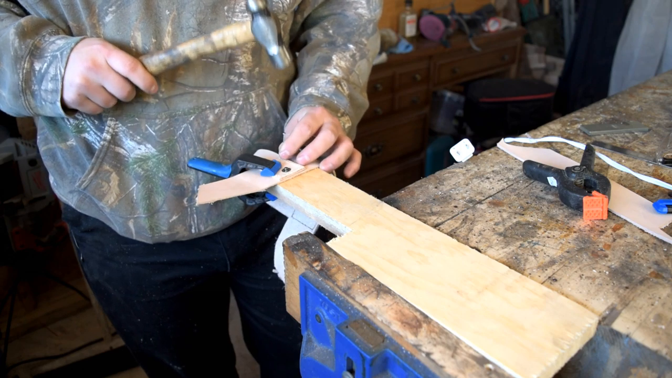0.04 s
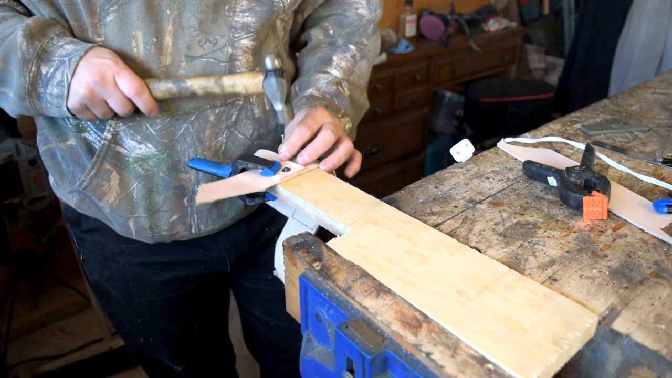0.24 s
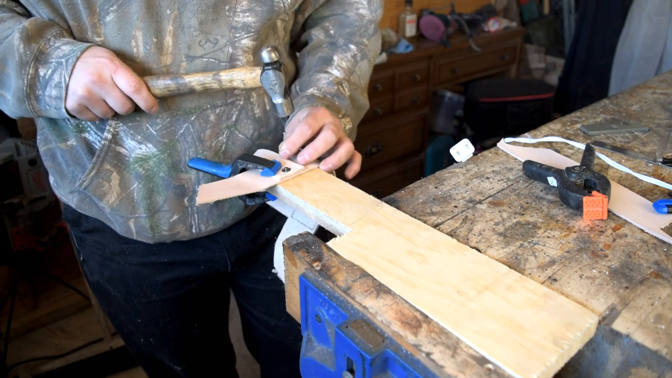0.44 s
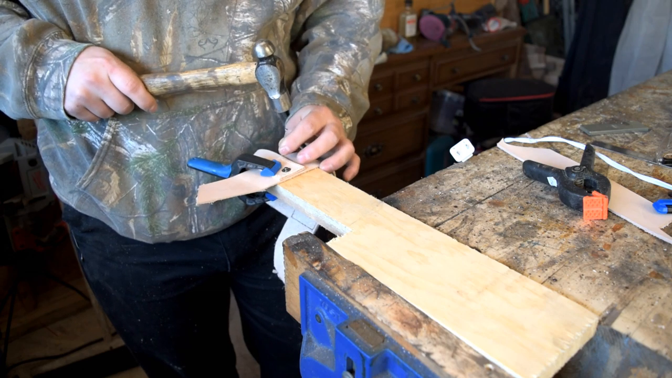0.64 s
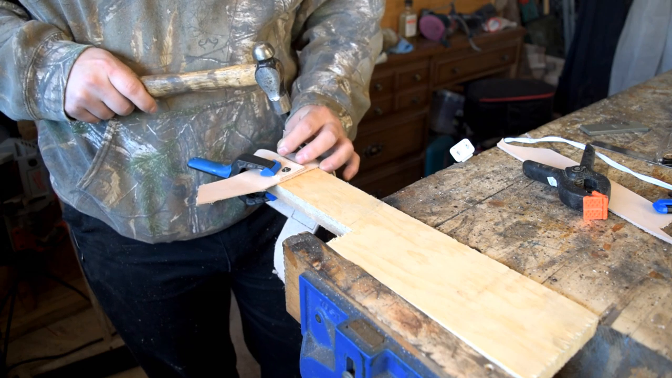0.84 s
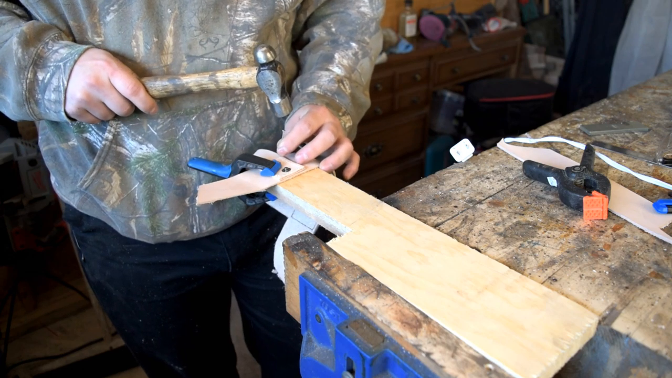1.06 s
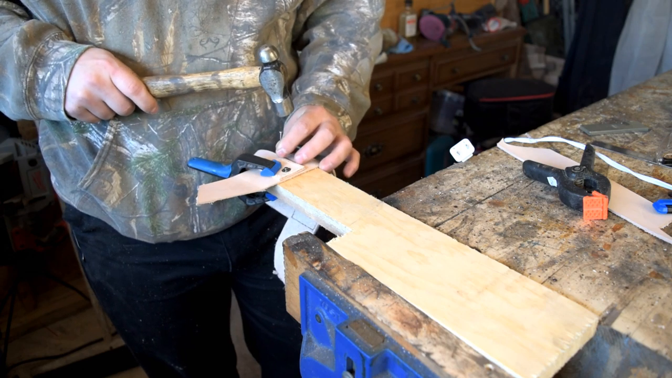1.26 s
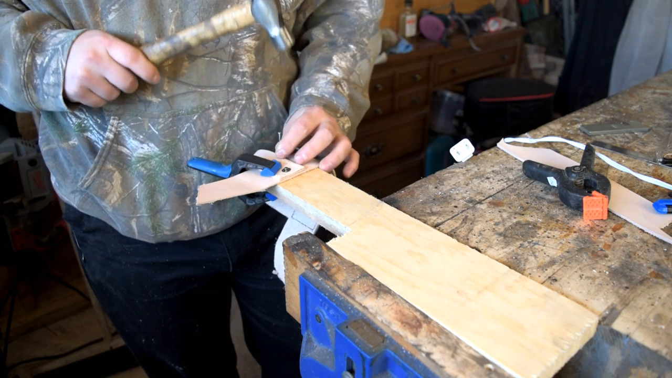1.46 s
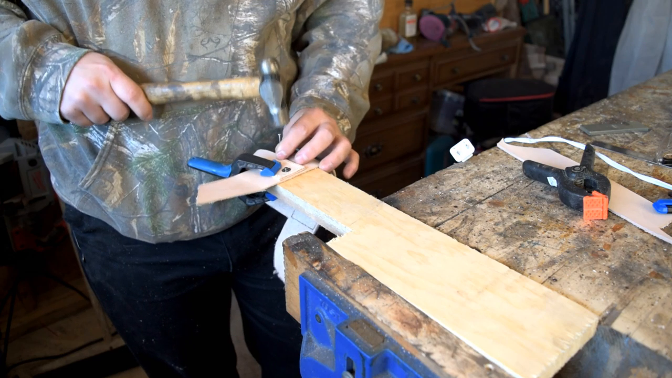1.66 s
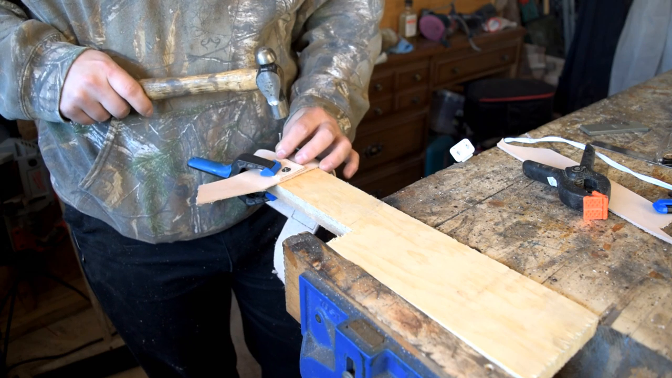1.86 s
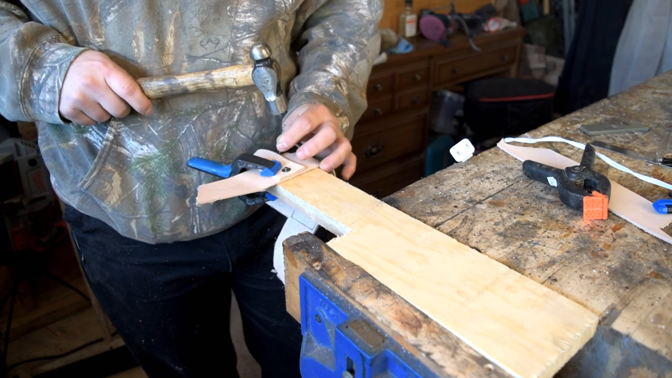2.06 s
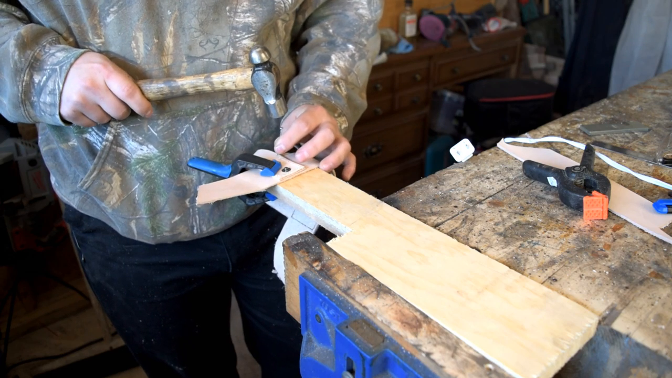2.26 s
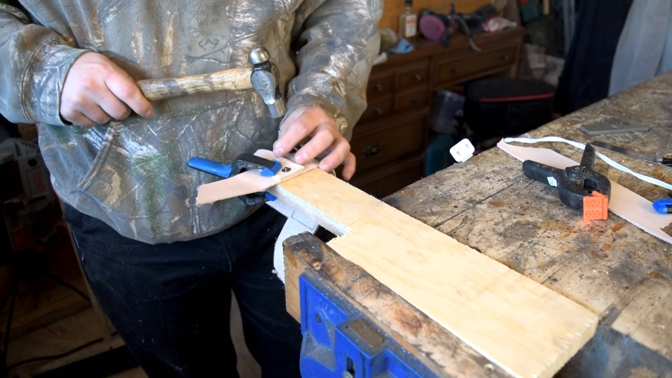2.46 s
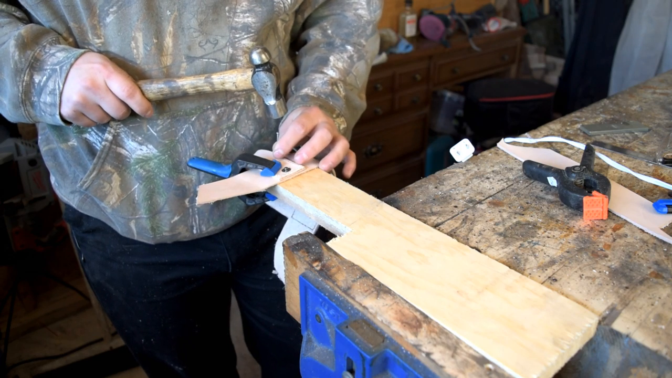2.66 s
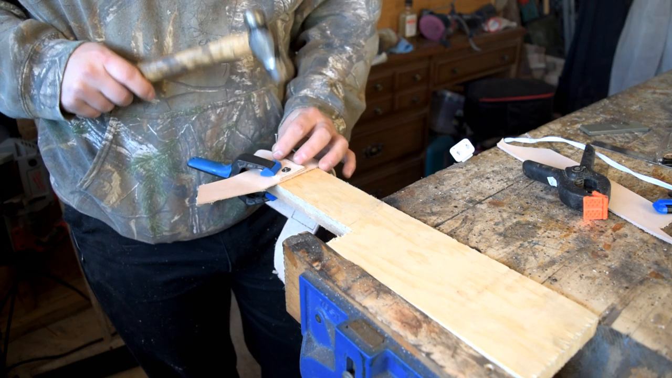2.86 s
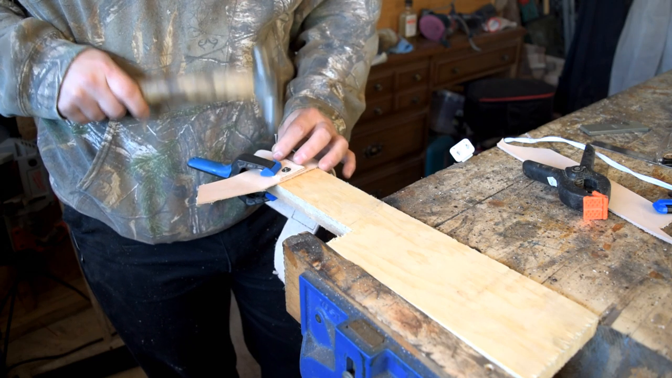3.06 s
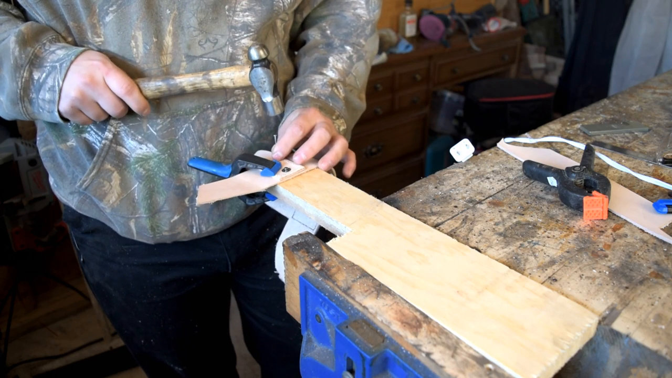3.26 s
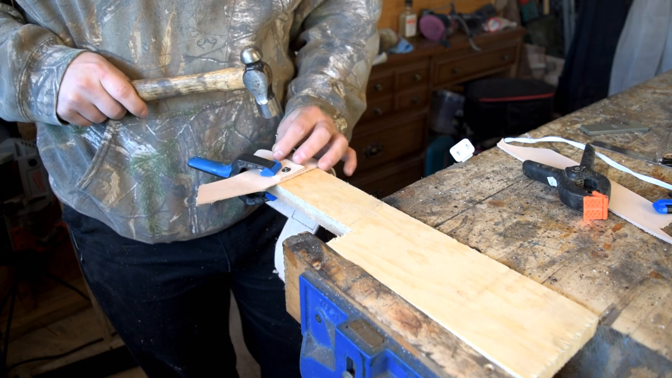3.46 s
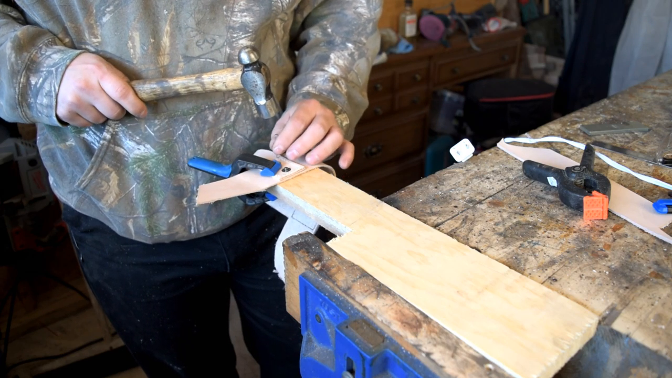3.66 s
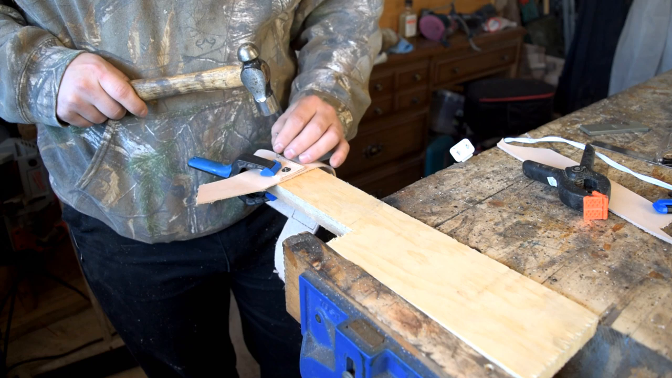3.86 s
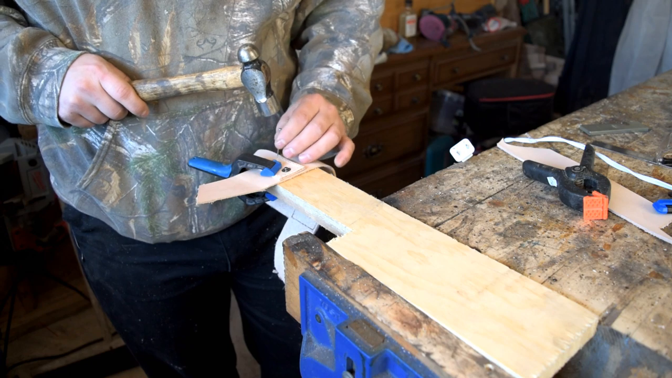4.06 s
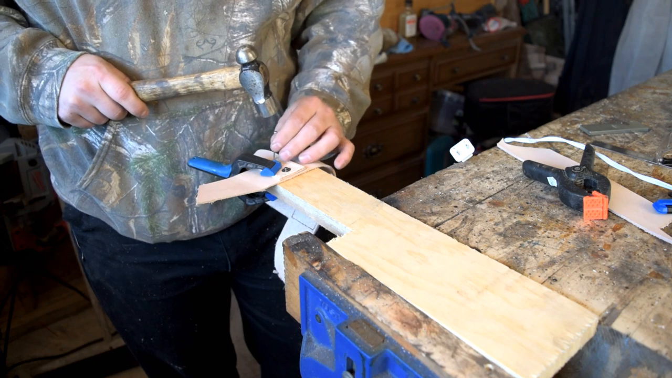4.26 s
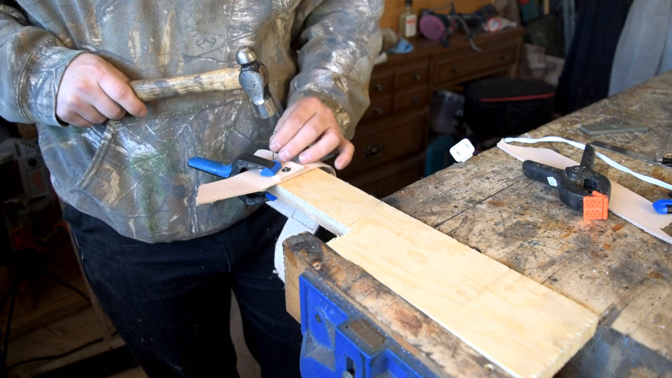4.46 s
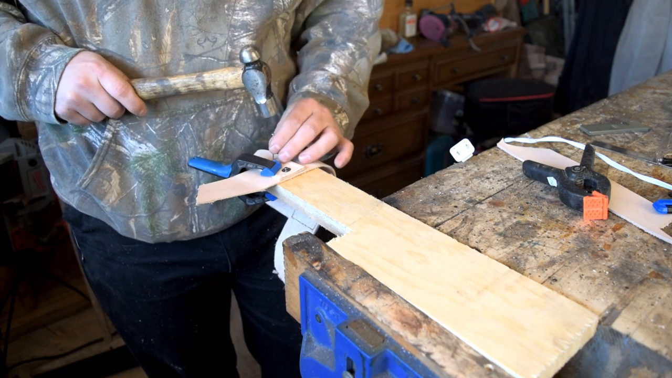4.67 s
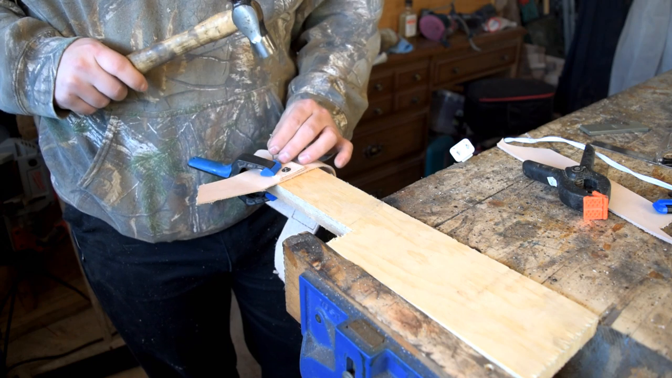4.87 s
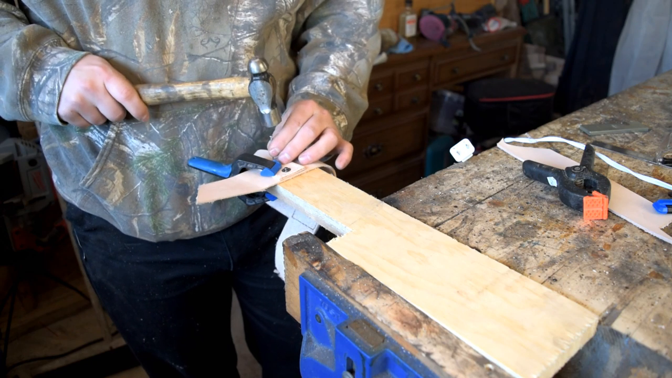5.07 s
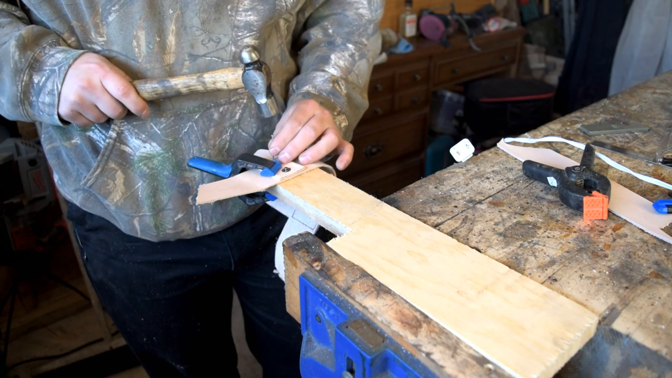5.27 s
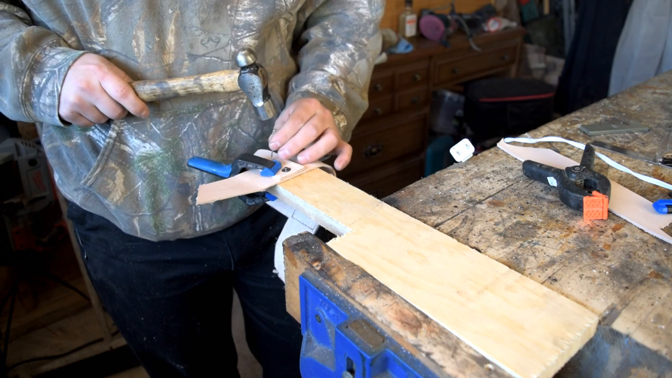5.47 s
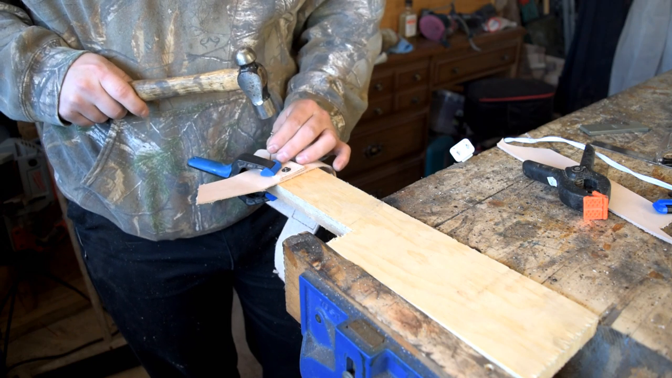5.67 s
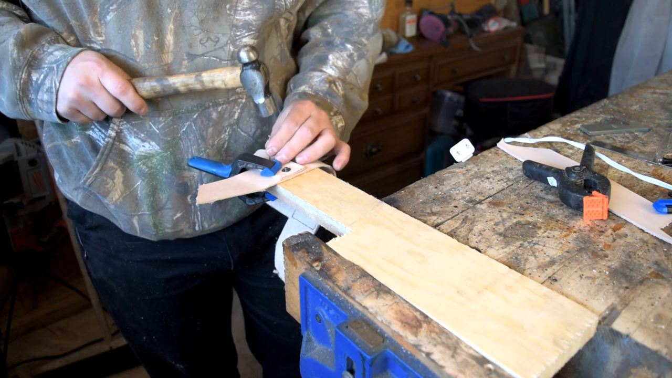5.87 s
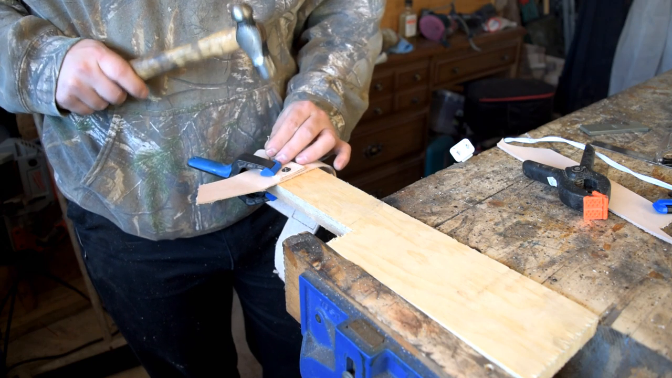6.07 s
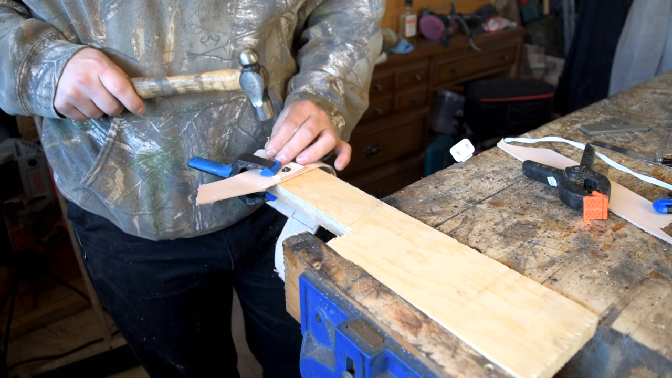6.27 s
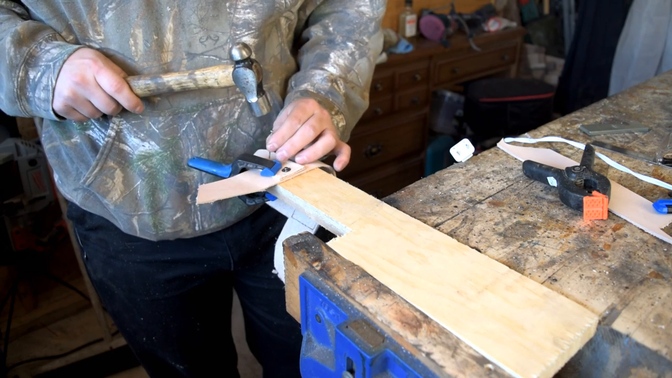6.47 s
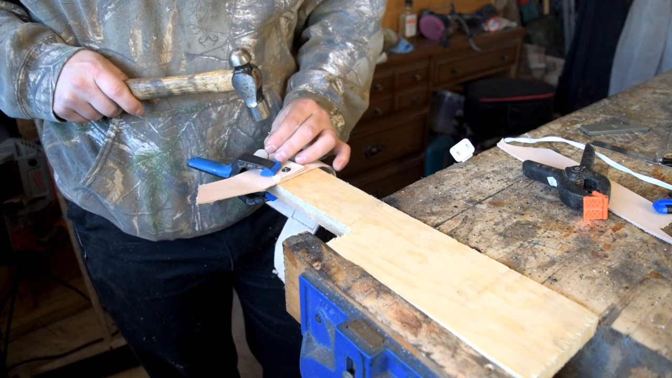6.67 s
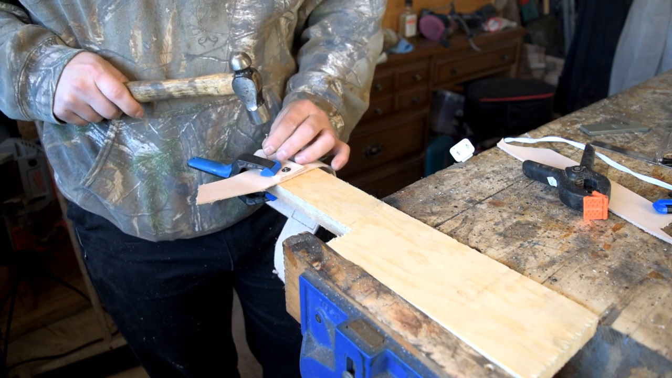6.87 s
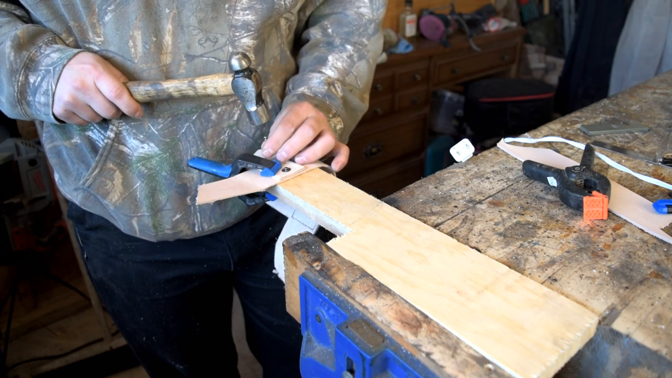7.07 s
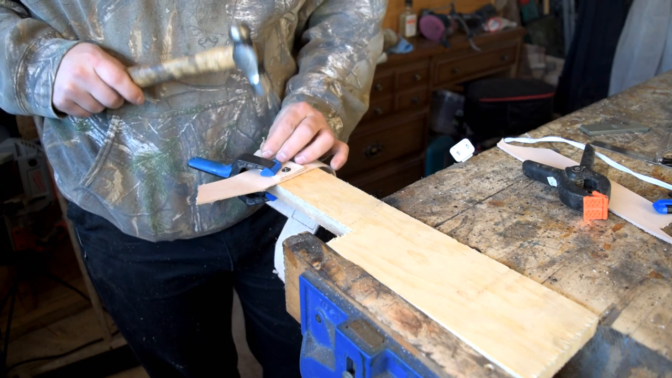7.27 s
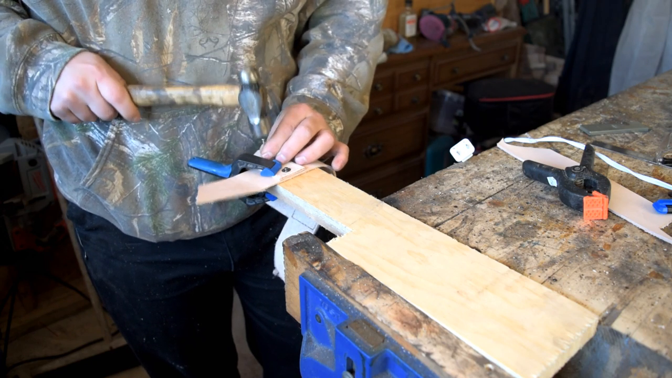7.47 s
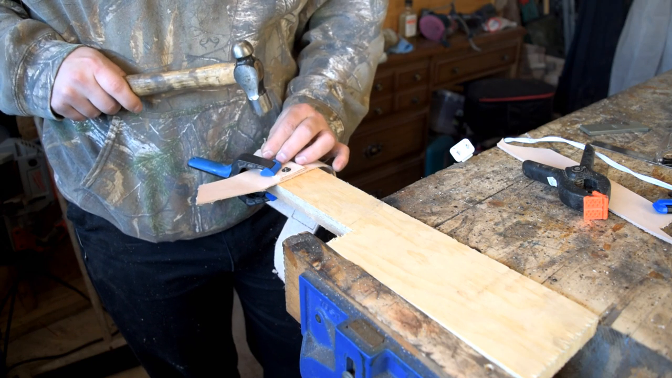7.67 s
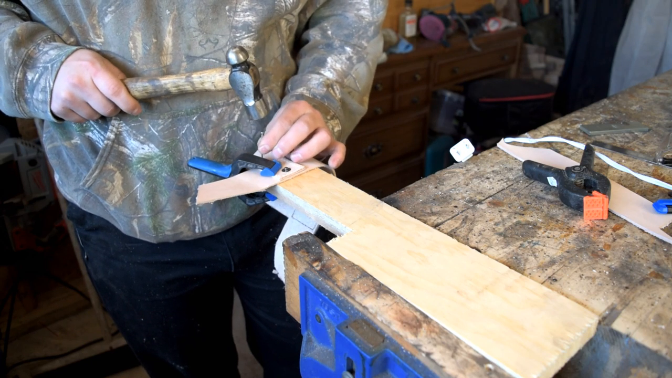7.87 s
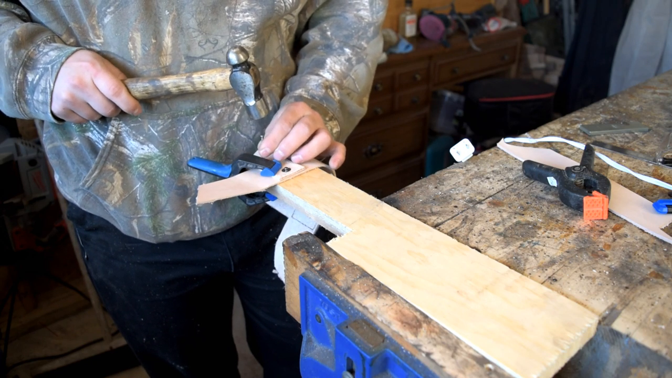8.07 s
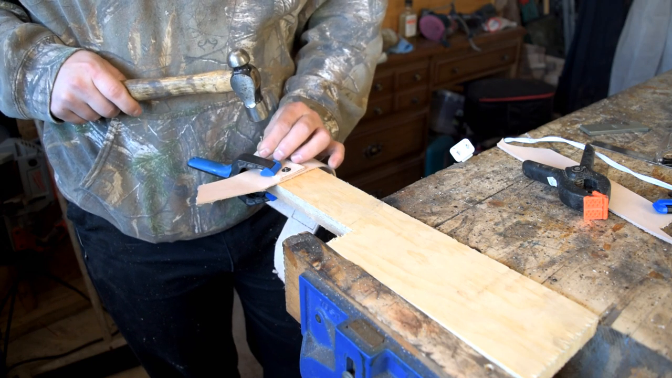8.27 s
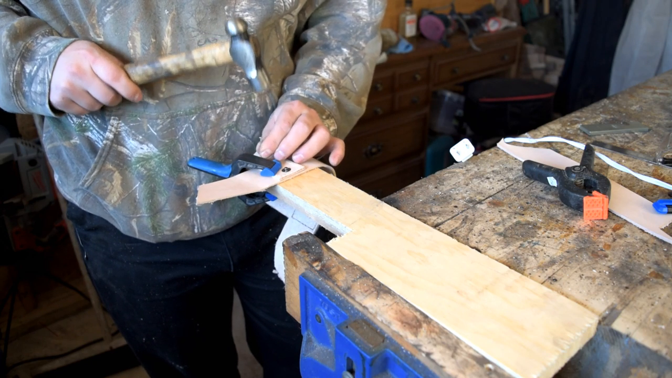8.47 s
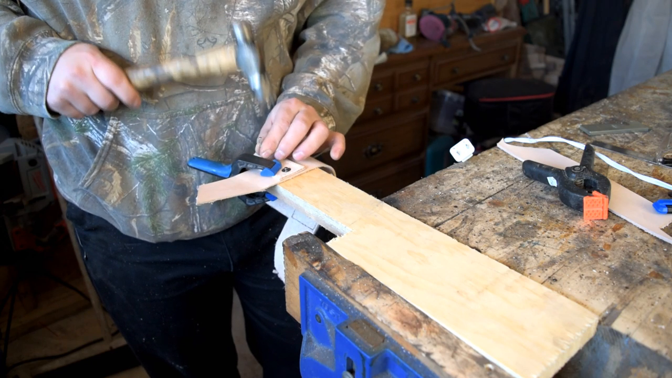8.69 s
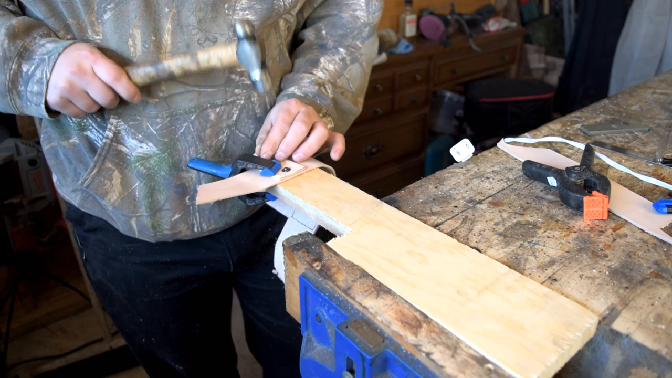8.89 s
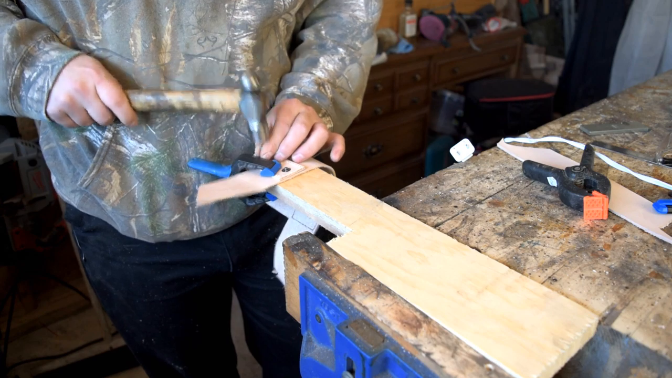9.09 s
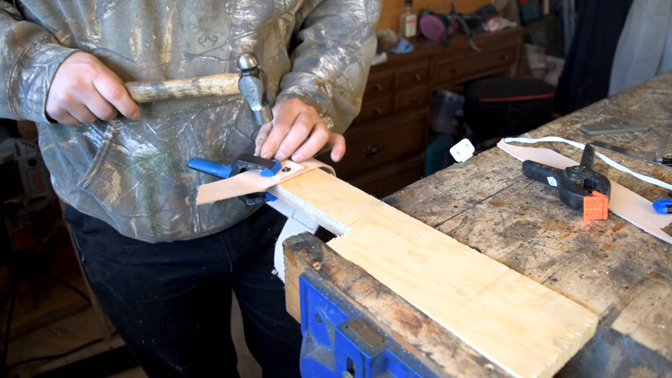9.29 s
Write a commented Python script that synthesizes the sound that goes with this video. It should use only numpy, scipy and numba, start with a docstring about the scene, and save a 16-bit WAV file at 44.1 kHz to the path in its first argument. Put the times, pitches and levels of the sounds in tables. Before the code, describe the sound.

Sharp, overloaded hammer blows on a wooden board in a vice, each followed by a short gritty rattle, in a quiet workshop.

```python
"""A quiet workshop: a small steel hammer drives a nail through leather into a board held in a bench vice.
Each blow rings the damped modes of board and bench under a crack and a buzz of noise grains; a moment later
the board rattles back in bunches of knocks and grit, and the steel vice sings. Light taps ring the same board,
filtered noise makes the rustles, and a decaying noise tail is the room, over rumble and hiss.
The near microphone overloads: its gain control ducks and recovers."""
import sys
import numpy as np
from scipy import signal
from scipy.fft import rfft, irfft
from scipy.io import wavfile
from scipy.ndimage import uniform_filter1d
from numba import njit

SR = 44100
rng = np.random.default_rng(int(sys.argv[2]) if len(sys.argv) > 2 else 0)


def wav_out(sig):
    """Save sig, one row per channel (or a flat mono array), as 16-bit PCM at SR to the path in sys.argv[1]."""
    wavfile.write(sys.argv[1], SR, np.round(np.clip(np.atleast_2d(sig).T, -1, 1) * 32767).astype(np.int16))


N = 411453  # length in samples

# hard blows: t/s, force/dB, rattle delay/s, rattle level/dB, steel ring/dB
BLOWS = [(0.2254, 7.5, 0.028, -7, -26.5), (1.6604, 8.5, 0.029, -6, -26), (3.1117, 7, 0.027, -5.5, -23.5),
         (5.028, 7.5, 0.027, -8, -36.5), (6.1732, 8, .029, -6.5, -25), (7.4764, 6, 0.03, -6.5, -23),
         (8.7764, 4, .026, -13, -43.5), (9.1118, 9, 0.031, -6.5, -28)]
# light taps on nail and board: t/s, force/dB, tilt/dB per octave, bench thud/dB, hollow note/dB
TAPS = [(0.172, -36, 2, -3, -27), (0.485, -34.5, -10.5, 9, 18), (1.314, -12.5, -3, -7.5, -9),
        (1.938, -29, -8, -20, -1), (1.971, -32, -9, 3, 4), (2.7405, -23.5, 1, 1, 6),
        (3.556, -32, -13, 6, -14), (3.682, -29.5, -6, -16, 10), (3.985, -28.5, -9, -4.5, 9),
        (4.693, -33, -1.5, -2, -5.5), (5.338, -35, -7, -8.5, 8), (5.88, -35, -5.5, -1.5, 3.5),
        (6.811, -40, -4, -29, 2), (6.869, -40.5, 3.5, -19, -2), (7.764, -32.5, -9.5, -6, 5.5),
        (7.784, -31.5, -3, -13, -6), (6.785, -47.5, 0, -16, 11), (7.932, -41.5, 0, 3.5, 2),
        (8.291, -38.5, 1, 1, -1), (8.493, -44, -5.5, 3, 10), (8.543, -49.5, -7, 12, -3)]
# modes of the bench, the main swing first: f/Hz, level/dB, t60/s
BENCH = [(53.16, -27, 1.206), (108.7, -28.5, .25), (51.3, -25, 0.44), (124.5, -23.5, 0.14),
         (151.16, -21, 0.27), (197, -23, 0.26), (280, -19, 0.051), (320, -15, 0.043), (383.1, -22.5, 0.22)]
# modes of the board: f/Hz, level/dB, t60/s
BOARD = [(534, -22.5, 0.06), (631.2, -21, 0.074), (790, -6, 0.012), (900, -12, 0.027), (964, -18.5, 0.05),
         (1098, -17, 0.035), (1058, -22.5, 0.046), (1151, -28, 0.045), (1476, -15.5, 0.013),
         (1637, -23, 0.015), (1787, -11.5, 0.014), (2040, -14.5, 0.0062), (1975, -13.5, 0.012),
         (2420, -12, 0.013), (2742, -11, 0.01), (2997, -14.5, 0.023), (3260, -16, 0.014),
         (3680, -11.5, .01), (4130, -12, .01), (4883, -12, 0.0047), (5430, -22.5, 0.004)]


def undb(db):
    """Turn decibels into an amplitude factor."""
    return 10 ** (np.asarray(db) / 20)


def tilt(hz, octave_db):
    """Gain of a contact whose spectrum tilts by octave_db per octave above 1 kHz."""
    return undb(octave_db * np.log2(np.maximum(hz / 1000, 1)))


def band(x, hz, width_hz):
    centred_low = np.sqrt(hz ** 2 + width_hz ** 2 / 4) - width_hz / 2  # hz is the geometric centre
    low = np.clip(centred_low, 10, SR * 0.4)
    high = min(low + width_hz, SR * 0.45)
    return signal.sosfilt(signal.butter(1, [low, high], "band", fs=SR, output="sos"), x)


def lowpass(x, order, hz):
    """Butterworth low-pass: softens the edges of a sound."""
    return signal.sosfilt(signal.butter(order, hz, fs=SR, output="sos"), x)


def strike(modes, times, force_db, octave_db, scatter_db=2.5, sides=1, rise_s=0):
    """Ring every mode at every hit; a softer contact feeds the high modes less, and no two hits land alike."""
    out = np.zeros(N)
    at = np.minimum(np.asarray(times) * SR, N - 1).astype(int)
    luck = rng.standard_normal((len(at), len(modes)))
    for k, (hz, db, t60) in enumerate(modes):
        direction = (-1) ** k * sides  # neighbouring modes start in opposite directions
        push = np.zeros(N)
        push[at] = direction * undb(force_db + db + scatter_db * luck[:, k]) * tilt(hz, octave_db)
        turn = np.exp(2j * np.pi * hz / SR)
        if rise_s:  # a heavy body gathers its swing: the push is spread out in step with the mode
            keep = np.exp(-1 / (rise_s * SR))
            push = signal.lfilter([1 - keep], [1, -keep * turn], push)
        decay = np.exp(-np.log(1000) / (t60 * SR))
        out += signal.lfilter([1], [1, -decay * turn], push).imag
    return out


def add(out, s, sound):
    """Mix a short sound in at time s."""
    i = int(s * SR)
    out[i:i + len(sound)] += sound[:N - i]


def burst(length_s, octave_db, grain_db):
    """Dense uneven clicks that die away, with bass and the highest treble rolled off."""
    t = np.arange(int(0.25 * SR)) / SR
    clicks, chance = rng.standard_normal((2, len(t)))
    unevenness = uniform_filter1d(chance, size=25) * 5  # times 5 restores the spread lost in averaging
    grains = clicks * undb(grain_db * unevenness)
    hz = np.fft.rfftfreq(len(t), 1 / SR)
    bass_cut = hz / (hz + 400)
    treble_cut = 1 / (1 + (hz / 9000) ** 4)
    dull = irfft(rfft(grains) * tilt(hz, octave_db) * bass_cut * treble_cut, len(t))
    return dull / np.std(dull) * np.exp(-t / length_s)


def floor():
    """Room rumble and microphone hiss: noise shaped to a spectrum, its rumble wavering slowly."""
    # spectrum of the noise: f/Hz, relative density/dB
    noise_spectrum = [(12, -19.5), (20, 7), (96, -1), (168, -4), (234, -6.5), (357, -11.5), (388, -11.5),
                      (513, -14.5), (718, -16), (1370, -21), (16000, -30)]
    level_db = -48  # rms of the whole floor
    corner_hz, corner_db = np.array(noise_spectrum).T
    hz = np.maximum(np.fft.rfftfreq(N, 1 / SR), 1)
    shape = undb(np.interp(np.log(hz), np.log(corner_hz), corner_db))
    noise = irfft(rfft(rng.standard_normal(N)) * shape, N)
    step = int(SR / 6)  # a new random level six times a second, smoothed into a drift
    waver = uniform_filter1d(np.repeat(rng.standard_normal(N // step + 1), step), step)[:N]
    rumble = lowpass(noise, 1, 300)
    noise = noise + rumble * (undb(2.2 * waver) - 1)
    return undb(level_db) * noise / np.std(noise)


def taps():
    """The same board, struck lightly, with a tick at the contact; some spots favour its hollow note."""
    thud_offset_db, tick_db = 5, -12  # bench and tick relative to the force
    rise_s = 0.0017  # leather spreads the push
    s, force_db, octave_db, thud_db, note_db = np.transpose(TAPS)
    out = strike(BOARD, s, force_db, octave_db, scatter_db=6.0, rise_s=rise_s)
    out += strike(BENCH[5:], s, force_db + thud_db + thud_offset_db, 0)  # upper bench modes only
    hollow_note = BOARD[3:4]
    # subtracted: this mode starts in the opposite direction within the board
    out -= strike(hollow_note, s, force_db + note_db, 0, scatter_db=3.5, rise_s=rise_s)
    for t, db, slope_db in zip(s, force_db, octave_db):
        add(out, t, undb(db + tick_db) * burst(0.0047, slope_db - 4.5, grain_db=4.0))
    return lowpass(out, 4, 4200)  # leather softens the edge


def rustles():
    """Grainy friction noise that swells and fades as fingers and tool brush leather and wood."""
    # brushing movements: t/s, length/s, level/dB, centre f/Hz, width/Hz
    brushes = [(1.359, 0.014, -40, 3800, 5970), (2.88, 0.11, -60.5, 5030, 5960),
               (3.513, 0.037, -52, 3100, 1500), (3.623, 0.091, -61, 3050, 600),
               (3.96, 0.038, -58, 2500, 2500), (8.345, 0.083, -56.5, 895, 500)]
    scuff = (0.03, -59, 2299.5, 2498)  # leather under every tap: length/s, level/dB, centre f/Hz, width/Hz
    scuffs = [(tap[0], *scuff) for tap in TAPS]
    out = np.zeros(N)
    for t, length_s, db, hz, width_hz in list(brushes) + scuffs:
        stream = burst(10.0, 0, grain_db=-3.5)  # long decay: an even stream of grains
        rub = band(band(stream, hz, width_hz), hz, width_hz)
        n = int(min(length_s, 0.25) * SR)
        swell = np.sin(np.pi * np.sqrt(np.arange(n) / n))  # rises faster than it fades
        add(out, t, undb(db) * rub[:n] / np.std(rub) * swell)
    return out


def room(dry):
    """Diffuse echoes that build up over a few milliseconds and fade band by band."""
    # reverberation of the workshop: f/Hz, level/dB, t60/s
    echo_bands = [(98, -34, 0.71), (185, -23, 0.36), (403, -37.5, 0.47), (890, -35, 0.25),
                  (1540, -30.5, 0.24), (3420, -31.5, 0.18), (6750, -41, 0.25), (11830, -42, 0.075)]
    t = np.arange(int(0.8 * SR)) / SR
    tail = np.zeros(len(t))
    for hz, db, t60 in echo_bands:
        echo = band(band(rng.standard_normal(len(t)), hz, hz), hz, hz)
        tail += undb(db) * echo * np.exp(-np.log(1000) * t / t60)
    build_up = 1 - np.exp(-t / 0.0071)
    return signal.fftconvolve(dry, tail * build_up)[:N]


def blows():
    """Board and bench ring, a crack marks the contact and the clamped board buzzes briefly."""
    swing_db = 6.5  # push on the bench, equal for all blows before scatter
    crack_db, buzz_db = -10.5, -20  # relative to the force
    # a harder blow is brighter: tilt in dB per octave at hard_db, and its change per dB of force
    hard_db, hard_tilt_db, brighter_per_db = 10, -4.5, 0.56
    s, force_db = np.transpose(BLOWS)[:2]
    octave_db = hard_tilt_db + brighter_per_db * (force_db - hard_db)
    bench = strike(BENCH, s, swing_db, 0, scatter_db=1.5, rise_s=0.011)
    out = strike(BOARD, s, force_db, octave_db, scatter_db=4.0) + bench
    for t, db, slope_db in zip(s, force_db, octave_db):
        add(out, t, undb(db + crack_db) * burst(0.0012, slope_db + 2.0, grain_db=5.0))
        add(out, t, undb(db + buzz_db) * burst(0.0088, slope_db - 4, grain_db=1.5))
    return out


def rattles(count=44):
    """Small knocks and grit, bunched once per swing of the bench and thinning out; steel sings along."""
    # modes of the steel vice: f/Hz, level/dB, t60/s
    steel = [(7535, -9, 0.16), (7505, -11, 0.12), (7460, -13, .06), (8200, -14, 0.05), (8700, -15, .05),
             (12190, -14, 0.03), (10600, -14, 0.02), (12300, -13, 0.035)]
    swing_s = 1 / BENCH[0][0]
    s, _, delay_s, level_db, steel_db = np.transpose(BLOWS)
    start_s = s + delay_s
    # a rattle that makes the steel ring louder is also brighter and longer
    lively = steel_db + 25  # dB of ring above -25
    octave_db = -3.5 + 0.19 * lively
    length_s = 0.03 + 0.00045 * lively

    chance = rng.random((len(BLOWS), count, 4))
    start, level, slope, length = (c[:, None] for c in (start_s, level_db, octave_db, length_s))
    bunch = swing_s * np.floor(-np.log(1 - chance[..., 0]) * length / swing_s)
    late = bunch - 0.007 * np.log(1 - chance[..., 3])  # knocks trail behind the start of their bunch
    fade_db = 4 * late / length
    soft_start_db = 5 * np.exp(-late / 0.002)
    knock_db = level - 0.5 - fade_db - 12 * chance[..., 1] - soft_start_db
    knock_s = (start + late).ravel()
    knock_tilt = (slope + 1.5 + 0 * late).ravel()  # one value for every knock
    sides = np.sign(chance[..., 2] - 0.5).ravel()
    wood = strike(BOARD, knock_s, knock_db.ravel(), knock_tilt, scatter_db=7.0, sides=sides)
    out = lowpass(wood, 2, 6500)  # wood on wood: soft edges

    ring_db = knock_db + (steel_db - level_db)[:, None]  # every knock shakes the vice
    out += strike(steel, knock_s, ring_db.ravel(), 0, scatter_db=1.5, rise_s=0.0012)

    for t, db, slope_db, decay_s in zip(start_s, level_db, octave_db, length_s):
        grit = burst(1.393 * decay_s, slope_db - 4.5, grain_db=3.0)
        age = np.arange(len(grit)) / SR
        onset = 1 - np.exp(-age / 0.002)
        sway = undb(2.3 * np.sin(2 * np.pi * age / swing_s))
        add(out, t, undb(db - 7) * grit * onset * sway)
    return out


def scene():
    """Sum the direct sounds, their echoes and the noise floor."""
    blow, tap = blows(), taps()
    rest = rattles() + rustles()
    # blows and taps reach the microphone largely through the bench, so the walls hear less of them
    walls = room(undb(-4) * blow + undb(-2.5) * tap + rest)
    return (blow + tap + rest + walls + floor())[None, :]


@njit
def gain_control(x, top, squeeze, attack, hold, release):
    """Follows the peak level, turns down what exceeds top, waits, then lets go."""
    y, level, wait = np.empty(len(x)), 0.0, 0.0
    for i in range(len(x)):
        if abs(x[i]) > level:
            level += (abs(x[i]) - level) * attack
            wait = hold
        elif wait > 0:
            wait -= 1
        else:
            level -= level * release
        y[i] = x[i] * min(1.0, (top / (level + 1e-9)) ** squeeze)
    return y


def record(dry):
    """Gain control reacts a little late, so the first swings of a blow clip; then the top is cut."""
    attack_s, hold_s, release_s = 0.0019, 0.024, 0.006
    top_hz = 16000
    ducked = gain_control(dry[0], 0.56, 1.0, 1 / (attack_s * SR), hold_s * SR, 1 / (release_s * SR))
    clipped = np.clip(ducked, -0.96, 0.96)
    top_cut = signal.ellip(10, 0.2, 70, top_hz, fs=SR, output="sos")  # 0.2 dB ripple, 70 dB stop band
    return signal.sosfilt(top_cut, clipped)[None, :]


dry = scene()
out = record(dry)
wav_out(out)
```